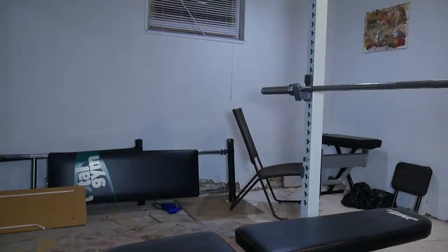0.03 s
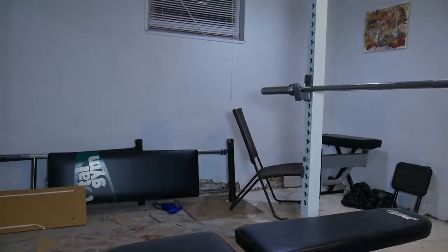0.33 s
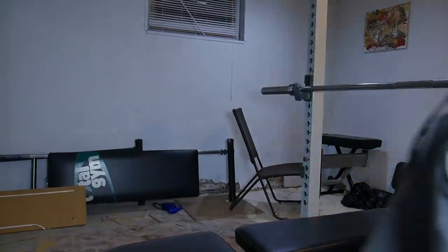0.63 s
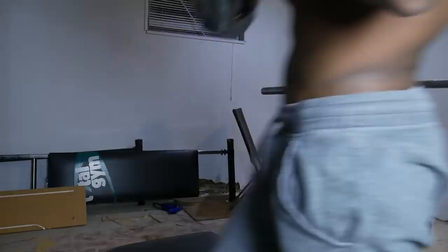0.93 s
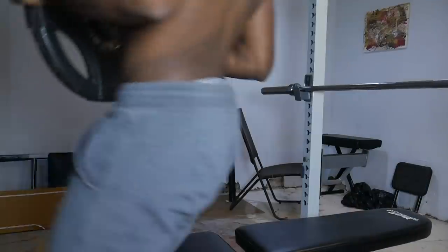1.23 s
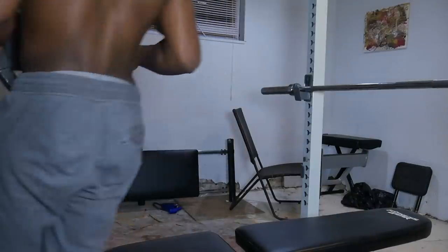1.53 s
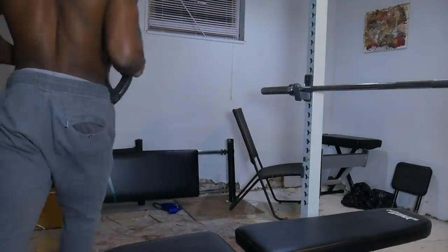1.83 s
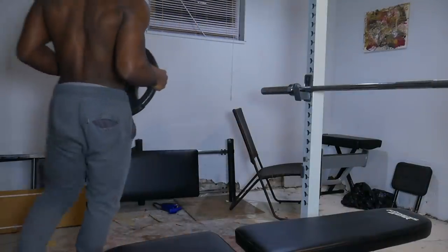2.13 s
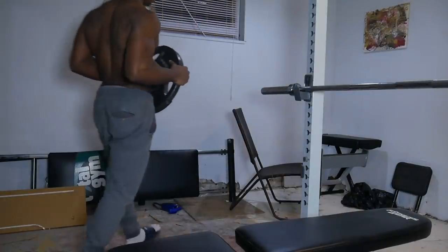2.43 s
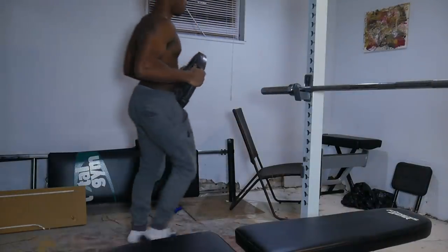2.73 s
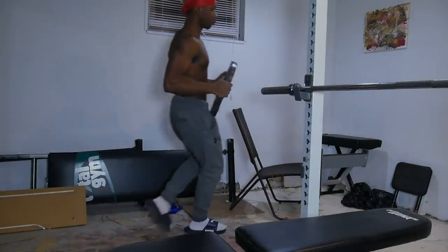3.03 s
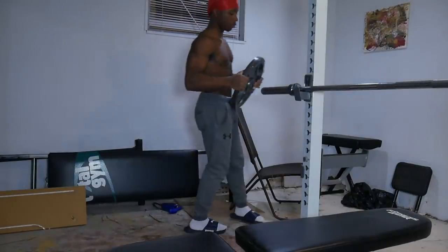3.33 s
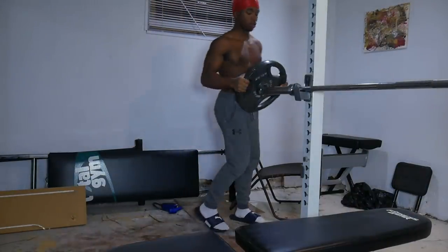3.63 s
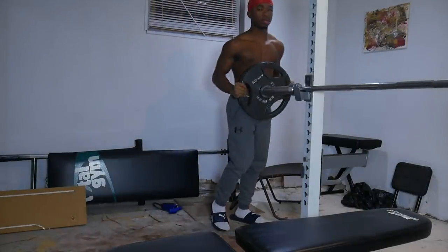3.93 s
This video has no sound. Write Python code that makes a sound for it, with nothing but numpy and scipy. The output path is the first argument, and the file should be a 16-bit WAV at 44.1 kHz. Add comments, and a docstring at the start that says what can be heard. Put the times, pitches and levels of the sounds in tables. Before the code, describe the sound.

A metal weight plate clanks and scrapes onto a barbell after soft, shuffling footsteps.

```python
"""Rubber slides shuffle across a hard gym floor as someone carries an iron weight plate through a small
bare room. The steps layer a dull heel thud, a sole slap and gritty scuffs; clothing rustles faintly.
Then the plate knocks against the end of a steel barbell, clanks onto it and scrapes along the sleeve;
both the hits and the friction set the metal ringing. A low drone and faint hiss sit underneath."""
import sys
import numpy as np
from scipy import signal
from scipy.fft import rfft, irfft
from scipy.io import wavfile

SR = 44100
rng = np.random.default_rng(int(sys.argv[2]) if len(sys.argv) > 2 else 0)


def unload_wav(signal):
    """Save mono or channel-first audio to the path in sys.argv[1] as 16-bit WAV at rate SR, clipped to [-1, 1]."""
    wavfile.write(
        sys.argv[1],
        SR,
        np.round(np.clip(np.atleast_2d(signal).T, -1, 1) * 32767).astype(np.int16),
    )


N = 176400
T = np.arange(N) / SR

# drone and hiss of the still room: (frequency [Hz], level per Hz [dB])
ROOM_TONE_SPECTRUM = [(20, -24), (36, -17), (52, -4), (75, -12.5), (108, 4), (120, -2.5), (131, 4),
                      (150, 0), (190, -4), (280, -11.5), (500, -16), (900, -17.5), (1500, -17.5),
                      (3200, -21.5), (6000, -29), (11000, -30.5), (16000, -40)]
# a sole slaps or slides, or clothing rustles faintly (the swell at 0.923 s):
# (time [s], attack [s], hold [s], level [dB], bass [dB], mid [dB], treble [dB])
FRICTION_STROKES = [(0, 0.00054, 0.0093, -48.5, 17, 6.5, -8), (0.302, 0.011, 0.024, -38, 0, -3, -2),
                    (0.791, 0.0022, 0.037, -42, 13.5, -3, 8), (.815, 0.012, 0.0055, -39, 8, -23, -14),
                    (0.923, 0.068, 0.11, -55.5, 0, 10.5, -4), (1.047, 0.023, 0.024, -43.5, 10, 4, 2.5),
                    (1.091, 0.016, 0.008, -29, -3.5, -2.5, -8),
                    (1.136, 0.0095, 0.025, -32, -16, 7.5, -10.5), (1.191, 0.0087, 0.0097, -43, 13.5, 5, -2),
                    (1.449, 0.0022, 0.054, -42, 16.5, 2.5, 8.5), (1.459, 0.012, 0.031, -27, -22, -9, -1.5),
                    (1.507, 0.022, 0.023, -32, -9, 0.5, 0), (1.577, 0.014, 0.033, -34, -8.5, 8, -5),
                    (1.709, 0.0059, 0.095, -48, 6, -3, -6.5), (1.91, 0.0084, 0.056, -39, 7, -9, 1.5),
                    (1.993, 0.0045, 0.091, -40, -1, -3, -5), (2.075, .014, 0.007, -28, -20, -2.5, -10),
                    (2.4, 0.025, 0.061, -29, 3, -9.5, 1.5), (2.504, 0.0027, 0.026, -23.5, -4, -1.5, -7.5),
                    (2.549, 0.024, 0.064, -39, 3, 7, -9.5), (2.856, 0.023, 0.023, -26.5, 3, 0, 6),
                    (2.894, 0.024, 0.027, -22, 7.5, 6.5, -1.5), (2.951, 0.013, 0.036, -30.5, 4, 4, -9),
                    (3.368, 0.029, 0.007, -44.5, -14, 4, 10.5),
                    (3.391, 0.0026, 0.0062, -36.5, -11, 4.5, -6), (3.419, 0.015, 0.007, -39.5, -13, 5.5, 7),
                    (3.465, 0.073, 0.095, -40.5, -6, 7, -1.5)]
# rubber on the floor, also the base colour of the rustle: (frequency [Hz], level per Hz [dB])
FRICTION_SPECTRUM = [(100, -10), (220, -13.5), (450, -11), (750, -3), (1200, -5), (1900, -5), (2500, -2),
                     (3050, -0.5), (3600, -2.5), (4500, -3.5), (6200, -7.5), (10500, -6.5), (13000, -11.5),
                     (16000, -22.5)]
# a heel lands: (time [s], level [dB], thud pitch [Hz])
HEEL_HITS = [(0.3029, -29.5, 407), (.305, -20.5, 770), (0.79, -31, 330), (1.024, -36, 860),
             (1.036, -29.5, 635), (1.4495, -22.5, 405), (1.668, -33.5, 227), (2.403, -32.5, 467),
             (2.859, -16, 334), (2.893, -18, 620), (3.059, -35.5, 257), (3.396, -30.5, 460)]
# the floor's boom under a heel: (frequency [Hz], level per Hz [dB])
FLOOR_SPECTRUM = [(120, -22), (220, -8), (400, -6), (650, -7), (1200, -21)]
# grit snaps under a sole: (time [s], level [dB], low cut [Hz])
GRIT_TICKS = [(1.0664, -23, 5000), (2.5076, -18, 2500), (2.512, -18.5, 1200), (2.752, -33.5, 5000)]
# the plate's bore rubs along the sleeve: (time [s], level [dB])
SLIDE_LEVELS = [(3.706, -28.5), (3.715, -31.5), (3.75, -31), (3.82, -26), (3.88, -23.5), (3.92, -22),
                (3.96, -25.5), (4.0, -26)]
# the plate strikes the bar: (time [s], level [dB], contact brightness [Hz], hub clank offset [dB])
PLATE_KNOCKS = [(3.7112, -3, 1220, -23), (3.723, -4.5, 1210, -12), (3.742, -7, 13800, -22),
                (3.7516, -1.5, 2880, -10), (3.7616, -13.5, 1980, 5), (3.7878, -2.5, 9400, 1.5),
                (3.799, -15.5, 7000, 4.5)]
# ring of plate and bar: (frequency [Hz], level [dB], t60 [s])
PLATE_BAR_MODES = [(667.8, -31.5, 2.3), (866, -31.5, .3), (891, -25.5, .35), (931, -27, .6),
                   (973, -23.5, .3), (1004, -31.5, .35), (1097, -33, .2), (1145, -35, .4), (1245, -33, .5),
                   (1322, -40, .4), (1432, -39, .6), (1586, -33, .3), (1669, -42, .4), (1747, -26.5, .3),
                   (1808, -33, .45), (1872, -37, .45), (1991, -33.5, .7), (2034, -38, .5)]
# thin, short rings of the steel sleeve: (frequency [Hz], level [dB], t60 [s])
SLEEVE_RINGS = [(2770, -35, 0.25), (3550, -38, .35), (4700, -34, .12), (7400, -34, .09), (7730, -35, 0.18),
                (8800, -40, .07), (11220, -31, 0.093)]
# brief clank of the hub: (frequency [Hz], level [dB], time to peak [s])
HUB_PARTIALS = [(930, -4, 0.0017), (1716, -6, 0.0019)]
# where the steel's high overtones crowd together: (centre frequency [Hz])
STEEL_CLUSTERS = [4550, 4970, 5230, 5800, 6350, 7160, 7640, 8640, 8800, 9200, 11000, 11600, 12200]
# iron rubbing on steel: (frequency [Hz], level per Hz [dB])
RASP_SPECTRUM = [(60, -50), (170, -11.5), (300, -17), (520, -8.5), (680, -26), (790, 0.5), (950, 0),
                 (1350, -3), (1900, 1), (2250, -11), (2800, -8.5), (3600, -7.5), (5000, -18.5), (6200, -20),
                 (7800, -17), (11500, -15.5), (16000, -16)]
# wash of weaker overtones from bar and rack: (frequency [Hz], level per Hz [dB])
JANGLE_SPECTRUM = [(60, -60), (170, -12), (300, -16), (550, -12.5), (700, 0), (790, -7), (950, 2),
                   (1400, -5.5), (1850, -11), (2250, -10.5), (3500, -17.5), (5000, -18.5), (6200, -28),
                   (8000, -20.5), (11500, -27), (16000, -36)]
# a hard iron edge cracks against steel: (time [s], level [dB])
EDGE_CRACKS = [(3.7473, -27), (3.7865, -25)]
# the walker's reverb send, lowest when passing close by: (time [s], level [dB])
WALKER_SEND = [(.35, 2), (.80, -3.5), (1.15, -5.5), (1.55, -0.5), (2.10, -3.5), (2.5, -3), (2.9, -4.5),
               (3.5, -3)]
# reverb decay of the room: (frequency [Hz], t60 [s])
ROOM_DECAY = [(150, 0.05), (400, 0.51), (1000, 0.61), (2800, 0.5), (7000, 0.44), (14000, 0.24)]
# stereo image of diffuse sound: (frequency [Hz], left-right correlation [ratio])
STEREO_CORRELATION = [(30, 0.65), (100, 0.86), (600, 0.81), (1400, 0.84), (2800, 0.84), (5600, 0.69),
                      (10000, 0.29), (14000, 0.23)]

GRIT_PER_S = 700  # rate of the grain in scuffs, rustle and rasp


def from_db(db):
    """Decibels to gain."""
    return 10 ** (np.asarray(db) / 20)


def at_hz(points, hz):
    """Read a curve on a log-frequency axis."""
    freqs, values = np.transpose(points)
    return np.interp(np.log(np.maximum(hz, 1)), np.log(freqs), values)


def noise(spectrum, size):
    """Coloured stereo noise, wider towards the treble; rms 1."""
    hz = np.arange(size // 2 + 1) * SR / size
    mid, side = rfft(rng.standard_normal((2, size))) * from_db(at_hz(spectrum, hz))
    alike = np.clip(at_hz(STEREO_CORRELATION, hz), -1, 1)
    x = irfft(np.sqrt(1 + alike) * mid + np.sqrt(1 - alike) * side * [[1], [-1]], size)
    return x / x.std()


def add(out, s, x):
    """Mix x in at s seconds."""
    i = int(s * SR)
    out[..., i:i + x.shape[-1]] += x[..., :max(N - i, 0)]


def ring(drive, hz, t60):
    """Resonator: a unit click starts a decaying sine of height 1."""
    r, w = from_db(-60 / (t60 * SR)), 2 * np.pi * hz / SR
    return signal.lfilter([0, np.sin(w)], [1, -2 * r * np.cos(w), r * r], drive + 1e-18)


def swell(t, peak_s):
    """Envelope with a rounded rise to 1 and a fall."""
    return t / peak_s * np.exp(1 - t / peak_s)


def cut(x, hz, kind, order=2):
    """Low- or high-pass."""
    return signal.sosfilt(signal.butter(order, min(hz, SR * .45), kind, fs=SR, output="sos"), x)


def grip(depth_db, size, per_s):
    """Uneven grip of two rough surfaces, as a fluttering gain."""
    return from_db(depth_db * np.interp(T[:size] * per_s, np.arange(size), rng.standard_normal(size)))


def room_tone(level_db=-50.5):
    """A steady bed of low drone and faint hiss."""
    return from_db(level_db) * noise(ROOM_TONE_SPECTRUM, N)


def scuffs_and_rustle(release_s=0.019, trim_db=-2):
    """Grainy, juddering friction of sole or cloth swells, holds and dies; each stroke has its own EQ."""
    out, size = np.zeros((2, N)), SR // 2
    t, hz = T[:size], np.arange(size // 2 + 1) * SR / size
    for s, attack, hold, db, bass, mid, treble in FRICTION_STROKES:
        eq_db = at_hz([(400, bass), (1150, mid), (3200, 0), (8500, treble)], hz)
        rub = irfft(rfft(noise(FRICTION_SPECTRUM, size)) * from_db(eq_db), size)
        judder = grip(2.5, size, per_s=140)
        judder /= np.sqrt(np.mean(judder ** 2))
        rub += cut(rub, 5500, "low", order=1) * (judder - 1)  # judder shakes mainly lows and mids
        envelope = np.minimum(t / attack, 1) * np.exp(-np.maximum(t - attack - hold, 0) / release_s)
        add(out, s, from_db(db + trim_db) * envelope * grip(2.5, size, GRIT_PER_S) * rub)
    return cut(out, 140, "high")


def heel_thuds(t60_cycles=3.14, attack_s=0.0002, boom_db=-19):
    """Each heel sinks in with a round, heavily damped thud, and the floor booms briefly."""
    out, t = np.zeros((2, N)), T[:SR // 10]
    for s, db, hz in HEEL_HITS:
        envelope = from_db(-60 * t * hz / t60_cycles) * (1 - np.exp(-t / attack_s))
        thud = envelope * np.sin(2 * np.pi * hz * t)
        boom = from_db(boom_db) * swell(t, peak_s=0.0099) * noise(FLOOR_SPECTRUM, len(t))
        add(out, s, from_db(db) * (thud + boom))
    dulled = cut(out, 1100, "low")
    return 2 * cut(dulled, 170, "high", order=4)


def grit_ticks(decay_s=0.0004):
    """Single grains crack with a tiny snap; the bigger ones reach lower."""
    out, t = np.zeros((2, N)), T[:SR // 20]
    for s, db, low_cut_hz in GRIT_TICKS:
        snap = rng.standard_normal((2, len(t))) * np.exp(-t / decay_s)
        add(out, s, from_db(db) * cut(snap, low_cut_hz, "high"))
    return out


def slide_envelope(attack_s=0.0042):
    """Strength of the rub between bore and sleeve."""
    fade_in = np.clip((T - SLIDE_LEVELS[0][0]) / attack_s, 0, 1)
    return from_db(np.interp(T, *np.transpose(SLIDE_LEVELS))) * fade_in


def plate_on_bar(catches_per_s=1300, rub_db=-12, strike_spread_db=1, ring_trim_db=-0.5):
    """Knocks clank the hub and strike each mode unevenly; the catching bore keeps the modes ringing."""
    out, t = np.zeros(N), T[:SR // 20]
    click = signal.unit_impulse(len(t))
    contacts = [(s, from_db(db) * cut(click, hz, "low")) for s, db, hz, _ in PLATE_KNOCKS]
    catches = (rng.random(N) < catches_per_s / SR) * rng.standard_normal(N)
    rub = cut(catches / catches.std(), 3260, "low") * slide_envelope() * from_db(rub_db)
    for hz, db, t60 in PLATE_BAR_MODES + SLEEVE_RINGS:
        drive = rub.copy()
        for s, contact in contacts:
            strength = from_db(strike_spread_db * rng.standard_normal())
            add(drive, s, contact * strength * rng.choice([-1, 1]))
        out += from_db(db + ring_trim_db) * ring(drive, hz, t60)
    clank = sum(from_db(db) * swell(t, peak_s) * np.sin(2 * np.pi * hz * t)
                for hz, db, peak_s in HUB_PARTIALS)
    for s, db, _, clank_db in PLATE_KNOCKS:
        add(out, s, from_db(db + clank_db) * clank)
    return cut(out, 350, "high")


def steel_noise(spectrum, size, width_hz=70, boost_db=8.5, shelf_db=-2):
    """Metallic noise: its treble gathers in the steel's overtone clusters."""
    hz = np.arange(size // 2 + 1) * SR / size
    ridges = sum(np.exp(-((hz - centre) / width_hz) ** 2) for centre in STEEL_CLUSTERS)
    eq_db = boost_db * ridges + shelf_db * (hz > STEEL_CLUSTERS[0] - width_hz)
    return irfft(rfft(noise(spectrum, size)) * from_db(eq_db), size)


def rasp_and_jangle(wash_db=-13.5, attack_s=0.0015, t60_s=0.31):
    """Dense overtones of bar and rack: a rasp while the plate slides and a wash after each knock."""
    rasp = cut(steel_noise(RASP_SPECTRUM, N), 5170, "low")
    out = rasp * slide_envelope() * grip(2, N, GRIT_PER_S)
    t = T[:SR // 2]
    for s, db, bright_hz, _ in PLATE_KNOCKS:
        wash = cut(steel_noise(JANGLE_SPECTRUM, len(t)), bright_hz, "low")
        envelope = np.minimum(t / attack_s, 1) * from_db(-60 * t / t60_s)
        add(out, s, from_db(db + wash_db) * envelope * wash)
    return cut(out, 110, "high")


def edge_cracks(decay_s=0.0075):
    """The hardest contacts of iron on steel open with a short, bright crack."""
    out, t = np.zeros((2, N)), T[:SR // 10]
    for s, db in EDGE_CRACKS:
        burst = cut(noise(JANGLE_SPECTRUM, len(t)), 2200, "high", order=4)
        add(out, s, from_db(db) * burst / burst.std() * np.exp(-t / decay_s))
    return out


def room_reverb(send, predelay_s=0.0026, build_s=0.0039):
    """Diffuse reflections off the bare walls build up quickly and die away in half-octave bands."""
    t, white = T[:SR], rfft(noise([(20, 0), (20000, 0)], SR))
    hz = np.arange(white.shape[1])
    band = np.round(2 * np.log2(np.maximum(hz, 100)))
    tail = sum(irfft(white * (band == k), SR) * from_db(-60 * t / at_hz(ROOM_DECAY, 2 ** (k / 2)))
               for k in np.unique(band))
    tail *= np.clip((t - predelay_s) / build_s, 0, 1)
    tail /= np.sqrt(np.sum(tail ** 2) / 2)  # unit energy per side
    return signal.fftconvolve(send, tail, axes=1)[:, :N]


def scene():
    """Walker and iron, direct and through the room; rasp, jangle and room tone bypass the reverb."""
    walker_db = np.interp(T, *np.transpose(WALKER_SEND))
    layers = [(heel_thuds(), walker_db - 3.5),  # (sound, reverb send [dB])
              (scuffs_and_rustle(), walker_db),
              (grit_ticks(), -6),
              (plate_on_bar() + edge_cracks(), -6.5)]
    direct = sum(sound for sound, _ in layers)
    send = sum(from_db(db) * sound for sound, db in layers)
    return direct + room_reverb(send) + rasp_and_jangle() + room_tone()


def record(dry, cutoff_hz=15800):
    """Clip the peaks at full scale, then cut the top with a steep low-pass."""
    low_pass = signal.ellip(10, .1, 80, cutoff_hz, fs=SR, output="sos")
    return signal.sosfilt(low_pass, np.clip(dry, -1, 1))


dry = scene()
out = record(dry)
unload_wav(out)
```